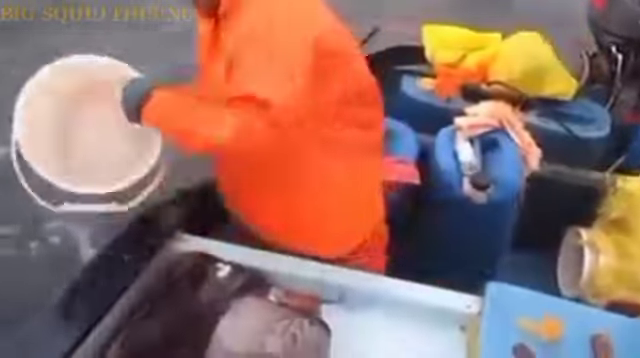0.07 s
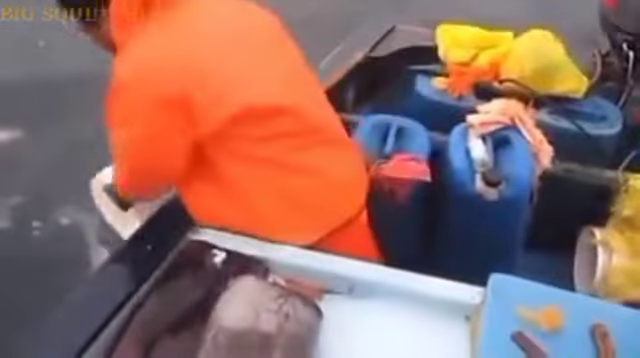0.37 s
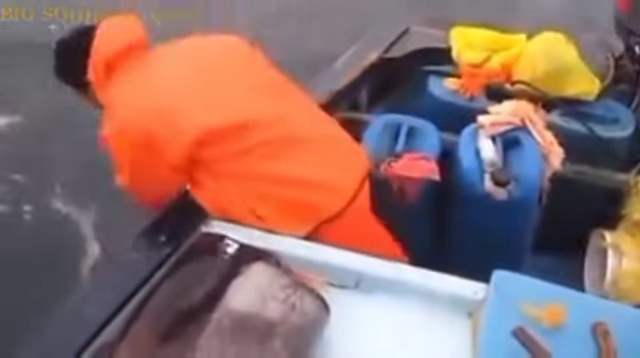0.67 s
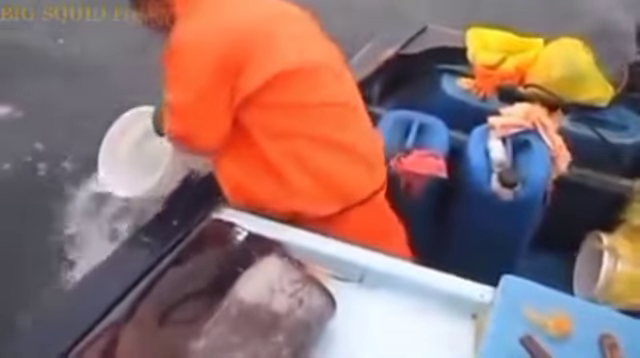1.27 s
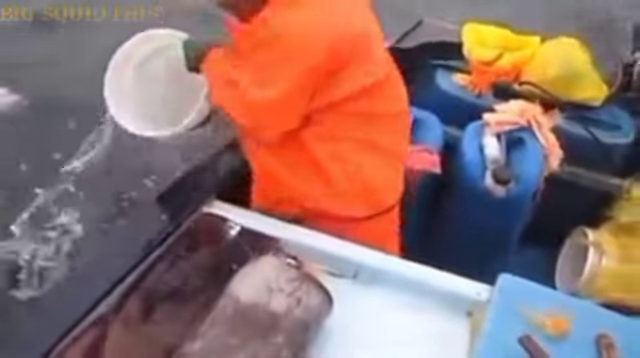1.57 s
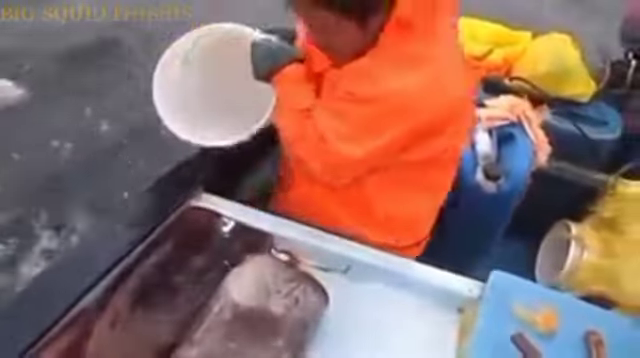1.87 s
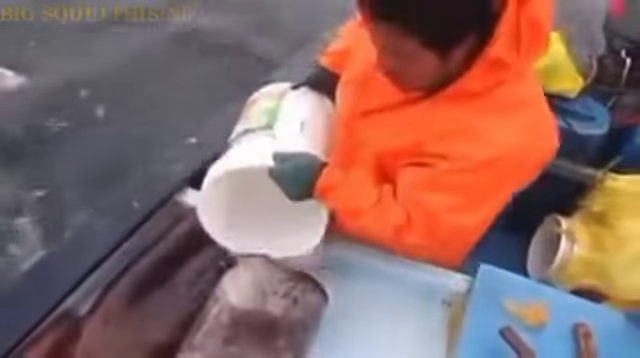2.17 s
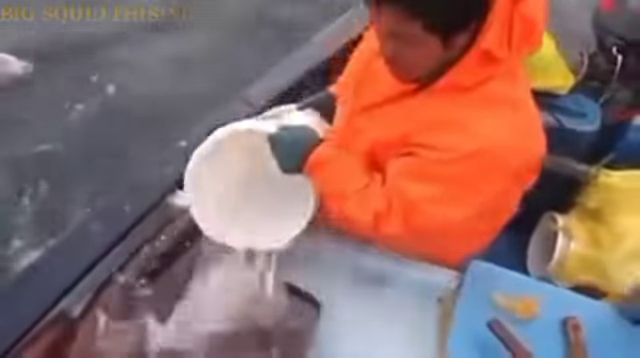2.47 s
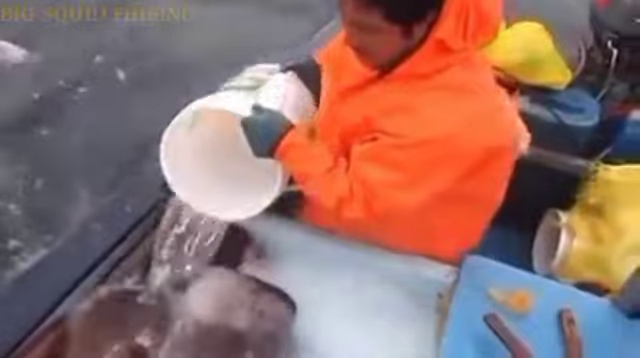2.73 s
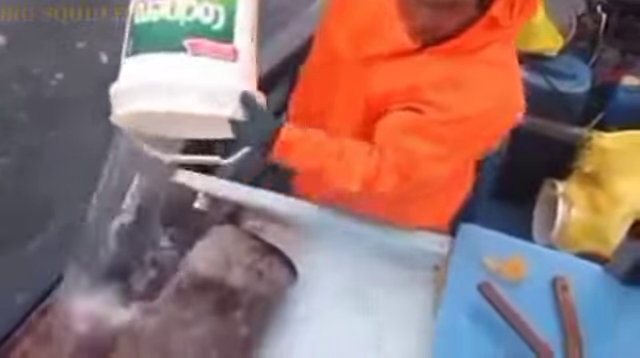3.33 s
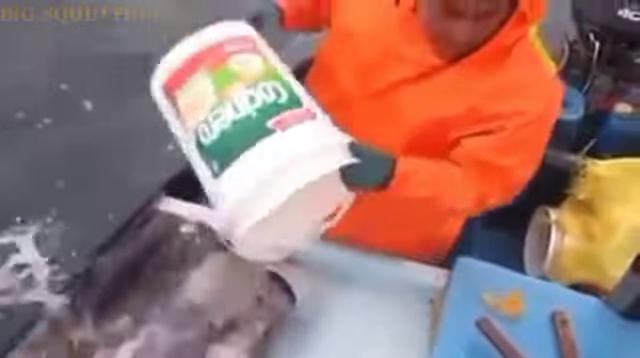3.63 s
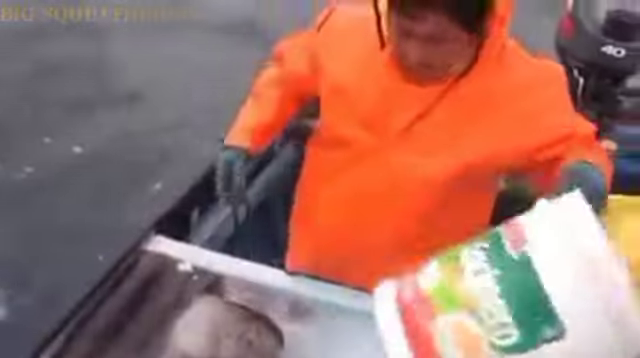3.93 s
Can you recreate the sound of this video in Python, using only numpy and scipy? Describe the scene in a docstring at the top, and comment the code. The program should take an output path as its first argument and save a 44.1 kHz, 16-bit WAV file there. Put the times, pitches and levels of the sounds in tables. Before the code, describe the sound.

Splashing water scooped and emptied from a bucket, with wind buffeting the microphone.

```python
"""On a small boat at sea, with the microphone out in the wind and a faint wash of water behind.
Gusts rumble, buffet, pop and hoot right on the microphone throughout.
Close by, a bucket is dipped over the side, hauled up streaming, and emptied over the deck in two pours.
The water is a mass of drop impacts and short ringing bubbles, with a few deeper glugs and sharp slaps,
all briefly reflected by the deck and sides of the boat."""
import sys
import numpy as np
from scipy import signal
from scipy.fft import rfft, irfft
from scipy.io import wavfile
from scipy.ndimage import map_coordinates

SR = 44100
rng = np.random.default_rng(int(sys.argv[2]) if len(sys.argv) > 2 else 0)


def to_wav(sig):
    """Store sig (one row per channel, or 1-D mono) as 16-bit WAV at the path in sys.argv[1].

    Samples outside -1..1 are clipped; the rate is SR.
    """
    pcm = np.clip(np.atleast_2d(sig), -1, 1) * 32767
    pcm = np.round(pcm).astype(np.int16)
    wavfile.write(sys.argv[1], SR, pcm.T)  # frames by channels


N = 176400


def amp(db):
    """Decibels to gain."""
    return 10 ** (np.asarray(db) / 20)


def unit(x):
    """Scales to rms 1."""
    return x / np.sqrt(np.mean(x ** 2) + 1e-20)


def add(mix, start_s, sound):
    """Mixes a sound in at a time."""
    at = round(start_s * SR)
    sound = sound[max(-at, 0):]
    part = mix[max(at, 0):][:len(sound)]
    part += sound[:len(part)]


def curve(points):
    """A level curve in dB at every sample, fading fast outside its span."""
    times, db = np.transpose(points)
    t = np.arange(N) / SR
    return np.interp(t, times, db) - 400 * abs(t - np.clip(t, times[0], times[-1]))


def colour(x, spectrum):
    """Filters by a spectrum and scales to rms 1."""
    hz, db = np.transpose(spectrum)
    f = np.fft.rfftfreq(len(x), 1 / SR)
    gain = amp(np.interp(np.log(f + 1), np.log(hz), db)) * (f > 0)
    return unit(irfft(rfft(x) * gain, len(x)))


def noise(spectrum, n=N):
    """Coloured noise of rms 1."""
    return colour(rng.standard_normal(n), spectrum)


def wander(hz):
    """Random drift of rms 1, up to about the given rate."""
    f = np.fft.rfftfreq(N, 1 / SR)
    return unit(irfft(rfft(rng.standard_normal(N)) * np.exp(-(f / hz) ** 2), N))


def sweep(field, speed, start=0):
    """Carries a frozen field of eddies past the microphone at a changing speed."""
    return map_coordinates(field, [(start + np.cumsum(speed)) % (len(field) - 1)], order=1)


# Open water all round the boat: freq_hz, level_db
SEA_SPECTRUM = [(60, 2), (300, 11), (800, 3.5), (1500, -0.5), (3000, -2.5), (5000, -4.5), (6000, -13),
                (7000, -33), (8000, -52)]


def sea(level_db=-46.5):
    """The open sea washes faintly and steadily in the background."""
    return amp(level_db) * noise(SEA_SPECTRUM)


# Wind on the microphone between buffets: time_s, level_db
WIND_STRENGTH = [(0, -29.5), (.16, -25), (.27, -32), (.32, -40), (.41, -23), (.49, -33), (.56, -32.5),
                 (.78, -24.5), (.9, -28), (1.1, -33.5), (1.25, -36.5), (1.33, -22), (1.49, -28),
                 (1.56, -38), (1.62, -29), (1.92, -29), (2.12, -29.5), (2.26, -21.5), (2.52, -38),
                 (2.61, -21), (2.71, -44), (2.92, -20), (3.12, -34.5), (3.3, -32), (3.35, -42),
                 (3.48, -25.5), (3.63, -41.5), (4, -28.5)]
# Its low rumble and lighter flutter: freq_hz, level_db
RUMBLE_SPECTRUM = [(20, -20), (45, -5), (100, -2), (150, -4), (250, -19), (500, -36), (1500, -82)]
FLUTTER_SPECTRUM = [(50, -9.5), (120, -0.5), (200, 6), (300, -7.5), (450, -11), (800, -20), (1500, -32.5),
                    (4000, -72.5)]


def wind(rumble_db=-1.5, flutter_db=-33, lump_db=2.5, speed_scatter=.28):
    """Rumble and flutter come in lumps and follow the wind's strength."""
    strength_db = curve(WIND_STRENGTH)
    lumps = wander(hz=45.07)
    rumble = amp(strength_db + rumble_db) * unit(amp(lump_db * lumps) * noise(RUMBLE_SPECTRUM))
    eddies = sweep(noise(FLUTTER_SPECTRUM), speed=np.exp(speed_scatter * lumps))
    flutter = amp(flutter_db) * unit(eddies * amp(strength_db + lump_db * lumps))
    return rumble + flutter


# Turbulent air at the microphone, at the reference eddy rate: freq_hz, level_db
EDDY_SPECTRUM = [(30, -11.5), (90, -5), (200, -1), (340, -3), (520, -8), (800, -18.5), (1400, -36.5),
                 (3000, -63), (6000, -88.5)]
# Buffets striking the microphone: centre_s, width_s, level_db, eddy_rate_hz
WIND_BUFFETS = [(0.007, 0.016, -17, 413.5), (0.027, 0.018, -17.5, 293), (0.089, 0.024, -22, 364),
                (0.121, 0.016, -28.5, 398), (0.159, 0.023, -22, 274.2), (0.382, 0.017, -22, 223),
                (0.411, 0.039, -21, 131.7), (0.446, 0.039, -17.5, 344.4), (0.671, 0.062, -22, 130.5),
                (0.775, 0.06, -24, 109), (0.791, 0.031, -18.5, 240), (0.821, 0.022, -15, 350),
                (0.845, 0.021, -19.5, 233), (0.948, 0.013, -19.5, 346), (0.972, 0.019, -29, 273),
                (1.202, 0.025, -21.5, 334), (1.224, 0.014, -18.5, 280.5), (1.349, 0.04, -31, 240),
                (1.43, 0.02, -16, 286), (1.485, 0.02, -15, 314.3), (1.518, 0.033, -20, 318),
                (1.626, 0.016, -15.5, 290), (1.647, 0.018, -20, 260.3), (1.732, 0.039, -20.5, 185.7),
                (1.8, 0.051, -25, 231), (1.905, 0.023, -17.5, 307.3), (1.947, 0.028, -25.5, 325),
                (2.012, 0.029, -22.5, 366), (2.066, 0.027, -24.5, 272.4), (2.127, 0.013, -22.5, 314),
                (2.25, 0.021, -16.5, 166.6), (2.496, 0.036, -27, 432), (2.598, 0.024, -24.5, 301.5),
                (2.635, 0.025, -20.5, 306.7), (2.776, 0.018, -20.5, 303.5), (2.799, 0.02, -17, 277.5),
                (2.912, 0.02, -20, 186), (2.966, 0.036, -22.5, 166), (3.047, 0.036, -16, 279.2),
                (3.47, 0.028, -19, 339.6), (3.729, 0.028, -22, 207), (3.872, 0.04, -24.5, 240),
                (3.992, 0.013, -18, 333)]


def buffets(trim_db=-0.56, span_widths=2.1, reference_hz=300, edge_speed=.7, speed_scatter=0.2404):
    """Each buffet swells and speeds up, so its eddies are brightest at the middle."""
    out = np.zeros(N)
    field = noise(EDDY_SPECTRUM)
    jitter = wander(hz=240)
    for centre_s, width_s, db, eddy_hz in WIND_BUFFETS:
        n = int(width_s * span_widths * SR)
        start = int(rng.random() * N)
        arch = np.hanning(n)
        unsteady = np.exp(speed_scatter * np.roll(jitter, start)[:n])
        speed = eddy_hz / reference_hz * (edge_speed + (1 - edge_speed) * arch) * unsteady
        puff = unit(arch * sweep(field, speed, start)) / np.sqrt(span_widths)
        add(out, centre_s - n / SR / 2, amp(db + trim_db) * puff)
    return out


# Gusts hooting for a few cycles on the microphone: centre_s, pitch_hz, peak_db
WIND_HOOTS = [(.007, 433, -14.5), (.106, 195, -9), (.838, 340, -14.5), (.947, 444, -20),
              (1.483, 267, -12.5), (1.49, 582, -18), (1.649, 564, -22.5), (3.039, 434, -15.5)]


def hoots(swell_s=0.008, glide=0.092):
    """Eddies leave the microphone's edge in step: a short hollow note that glides a little."""
    out, t = np.zeros(N), np.arange(-2048, 2048) / SR
    swell = np.exp(-(t / swell_s) ** 2)
    for centre_s, hz, db in WIND_HOOTS:
        phase, lean = rng.uniform(-1.15, 1, 2)
        turns = hz * t * (1 + lean * glide * t / swell_s) + phase
        add(out, centre_s + t[0], amp(db) * swell * np.sin(2 * np.pi * turns))
    return out


# Single tight eddies popping on the microphone: centre_s, level_db, core_s
WIND_POPS = [(.151, -25, 0.0004), (.162, -11.5, 0.00029), (.228, -17.5, 0.00034), (0.254, -4, 0.00043),
             (.432, -7.5, 0.00022), (0.439, -7.5, 0.00026), (.579, -19, 0.00053), (0.752, -6.5, 0.00063),
             (0.851, -4.5, 0.00045), (0.874, -9, 0.0003), (1.226, -10, 0.00063), (1.640, -5, 0.00022),
             (1.93, -6, 0.00026), (2.852, -17.5, .0005), (2.996, -7, 0.00054), (3.091, -9.5, 0.0007),
             (3.18, -10, 0.0008), (3.479, -5.5, 0.0002), (3.878, -11.5, 0.0005)]


def pops(trim_db=-2.5, tail_stretch=1.08, flurry_db=-18.5, flurry_s=0.014):
    """A vortex core crosses the microphone: pressure rises, flips and trails back amid a small flurry."""
    out, t = np.zeros(N), np.arange(-1024, 1024) / SR
    for centre_s, db, core_s in WIND_POPS:
        position = t / core_s / np.where(t > 0, tail_stretch, 1)
        swing = 2 * position / (1 + position ** 2) * np.exp(-(position / 5) ** 2)
        flurry = amp(flurry_db) * np.exp(-(t / flurry_s) ** 2) * noise(EDDY_SPECTRUM, len(t))
        add(out, centre_s + t[0], amp(db + trim_db) * (flurry - swing))
    return out


def low_cut(air, cutoff_hz=33):
    """The microphone cuts the deepest bass of the moving air."""
    return signal.sosfilt(signal.butter(2, cutoff_hz, "high", fs=SR, output="sos"), air)


def hull(direct, echo_db=-11.5, decay_s=0.0097, gap_s=.002):
    """The nearby deck and sides of the boat add brief scattered reflections."""
    t = np.arange(SR // 8) / SR
    taps = rng.standard_normal(len(t)) * (rng.random(len(t)) < .05)
    taps *= (t > gap_s) * np.exp(-t / decay_s)
    return direct + amp(echo_db) * signal.oaconvolve(direct, taps / np.linalg.norm(taps))[:N]


# Slaps of water and bucket, close by: start_s, level_db
WATER_SLAPS = [(0.264, -28.5), (1.044, -32), (1.186, -29), (1.386, -26), (2.178, -26), (2.232, -26),
               (2.313, -20.5), (2.366, -18.5), (2.422, -22), (3.203, -32.5), (3.313, -26), (3.593, -20.5)]
# Their tone at the microphone: freq_hz, level_db
SLAP_SPECTRUM = [(300, -21.5), (1100, 8), (1800, 0), (2500, 8), (3500, 3), (5000, -1), (6100, -8.5),
                 (7200, -26.5), (8200, -30.5)]


def slaps(rise_s=0.0038, decay_s=0.0089):
    """Water and bucket strike in short bright smacks that die quickly."""
    out, t = np.zeros(N), np.arange(4096) / SR
    envelope = np.minimum(t / rise_s, 1) * np.exp(-t / decay_s)
    for start_s, db in WATER_SLAPS:
        add(out, start_s, amp(db) * envelope * noise(SLAP_SPECTRUM, len(t)))
    return out


# Large pockets of air trapped in the pours on deck: start_s, pitch_hz, level_db
AIR_POCKETS = [(2.46, 1240, -21), (2.505, 960, -15), (2.563, 1040, -13.5), (2.676, 1130, -7),
               (2.762, 1120, -16), (3.358, 640, -18), (3.409, 1000, -12.5), (3.575, 1280, -15)]


def glugs(decay_s=0.003, pitch_rise=0.041):
    """A pocket of air closes and rings briefly, rising in pitch."""
    out, t = np.zeros(N), np.arange(0, 6 * decay_s, 1 / SR)
    for start_s, hz, db in AIR_POCKETS:
        turns = hz * t * (1 + pitch_rise * t / decay_s / 2)
        envelope = np.exp(-t / decay_s) * (1 - np.exp(-2 * turns))
        add(out, start_s, amp(db) * envelope * np.sin(2 * np.pi * turns))
    return out


def hits(per_s, spread_db):
    """Random impulses of either sign; a positive spread makes a few louder, a negative one softer."""
    chance = rng.random(N)
    size = np.minimum(rng.exponential(1, N), 4)
    sign = rng.choice([-1., 1.], N)
    return (chance < per_s / SR) * sign * amp(spread_db * size)


def bubbles(low_hz=419.3, high_hz=6898, sizes=56, ring_cycles=8.8, pitch_rise=0.0705, swarm_db=2.5):
    """Bubbles ring for some cycles, rising in pitch near the surface; like sizes come in swarms."""
    out = np.zeros(N)
    pitches = np.geomspace(low_hz, high_hz, sizes) * rng.uniform(1.0, 1.02, sizes)
    for k, hz in enumerate(pitches):
        if k % 5 == 0:  # five neighbouring sizes swell together
            swarm = amp(swarm_db * wander(hz=14))
        decay_s = ring_cycles * rng.uniform(0.61, 1.4) / hz
        t = np.arange(0, 5 * decay_s, 1 / SR)
        envelope = np.exp(-t / decay_s) * (1 - np.exp(-t * hz))
        ring = envelope * np.sin(2 * np.pi * hz * t * (1 + pitch_rise * t / decay_s / 2))
        per_s = 2800 / sizes * np.sqrt(hz / 2000)  # small bubbles form more often
        births = swarm * hits(per_s, spread_db=3)
        out += np.sqrt(hz) * unit(signal.oaconvolve(births, ring)[:N])
    return unit(out)


def drops(per_s=3000, energy_decay_s=0.00079):
    """Each drop bursts in a tiny puff of spray."""
    impacts = hits(per_s, spread_db=-3)
    energy = signal.lfilter([1], [1, -np.exp(-1 / (energy_decay_s * SR))], impacts ** 2)
    return unit(np.sqrt(energy) * rng.standard_normal(N))


# Flow as the bucket dips and streams over the side, then pours twice on deck: time_s, level_db
SCOOP_FLOW = [(.65, -57.5), (1.0, -53), (1.06, -43), (1.12, -46.5), (1.19, -36), (1.25, -39), (1.41, -34.5),
              (1.5, -42.5), (1.62, -39.5), (1.67, -47), (1.72, -45), (1.76, -35.5), (1.88, -39.5),
              (1.96, -52), (2.15, -41.5), (2.3, -63)]
FIRST_POUR_FLOW = [(2.12, -53), (2.21, -44), (2.235, -32), (2.35, -32), (2.385, -25.5), (2.55, -25),
                   (2.72, -26), (2.9, -31), (2.99, -34), (3.09, -52)]
SECOND_POUR_FLOW = [(3.14, -45), (3.2, -42.5), (3.3, -44), (3.33, -33.5), (3.405, -26.5), (3.45, -34.5),
                    (3.52, -24.5), (3.585, -27.5), (3.61, -33), (3.7, -31.5), (3.8, -32.5), (3.92, -30.5),
                    (4.0, -30)]
# Water landing on the sea, the deck and the wet deck, heard from on board: freq_hz, level_db
ON_SEA_SPECTRUM = [(250, -15), (600, -2), (900, 2.5), (1300, 4.5), (2500, 0.5), (3800, -2), (5000, -7.5),
                   (6000, -15), (7000, -27.5), (8500, -61)]
ON_DECK_SPECTRUM = [(200, -3.5), (450, 0.5), (750, -5.5), (1150, 0), (1700, -2.5), (3000, -4), (4200, -7),
                    (5200, -11), (6100, -20.5), (7000, -30), (8500, -64.5)]
ON_WET_DECK_SPECTRUM = [(200, 1.5), (450, -0.5), (750, -0.5), (1300, 2.5), (1900, 0.5), (3200, 0),
                        (4200, -3), (5200, -6.5), (6100, -15), (7000, -26), (8500, -56.5)]


def water(flow, spectrum, froth, gain_db, drops_db, clump_db):
    """Bubbles and drops arrive in clumps under the flow, coloured by where the water lands."""
    grains = froth + amp(drops_db) * drops()
    clumps = amp(clump_db * wander(hz=68))
    return amp(curve(flow) + gain_db) * colour(grains * clumps, spectrum)


def scene():
    """One microphone on board: the sea behind, wind on the capsule, the bucket's water in front."""
    froth = bubbles()
    scoop = water(SCOOP_FLOW, ON_SEA_SPECTRUM, froth, gain_db=2.0, drops_db=1.5, clump_db=1.0)
    first = water(FIRST_POUR_FLOW, ON_DECK_SPECTRUM, froth, gain_db=2.0, drops_db=4.5, clump_db=1.0)
    second = water(SECOND_POUR_FLOW, ON_WET_DECK_SPECTRUM, froth,
                   gain_db=1.5, drops_db=4.5, clump_db=1.7)
    wash = sea()
    bucket = hull(scoop + first + second + glugs() + slaps())
    air = low_cut(wind() + buffets() + hoots() + pops())
    return (wash + air + bucket)[None]


def record(dry, ceiling_db=-1.5, top_hz=8500):
    """The microphone rounds off the largest peaks; then the highest treble is cut."""
    rounded = dry / (1 + (dry / amp(ceiling_db)) ** 4) ** (1 / 4)
    lowpass = signal.firwin(511, top_hz, window=("kaiser", 9), fs=SR)
    return signal.oaconvolve(rounded, lowpass[None], "same")


dry = scene()
out = record(dry)
to_wav(out)
```